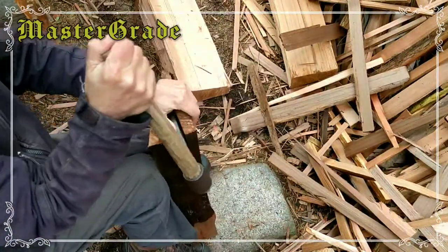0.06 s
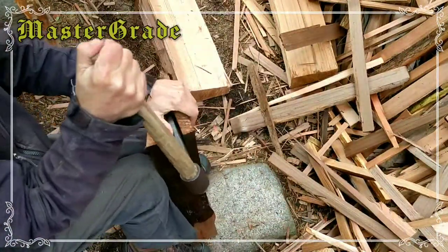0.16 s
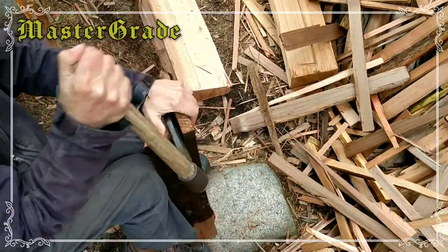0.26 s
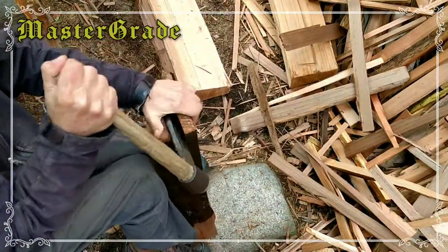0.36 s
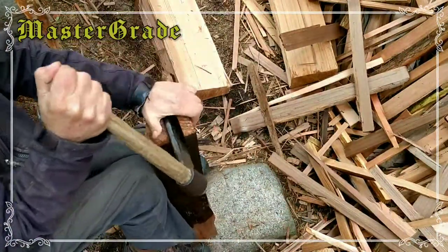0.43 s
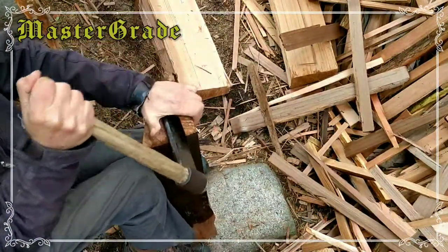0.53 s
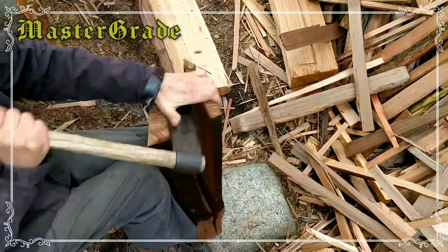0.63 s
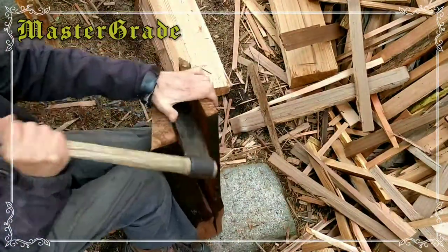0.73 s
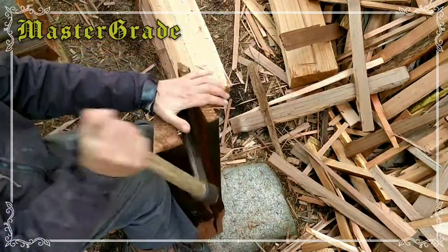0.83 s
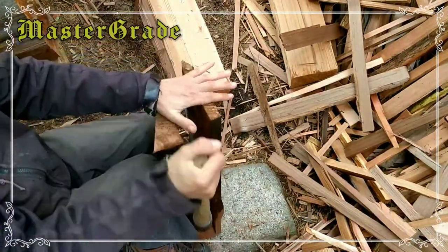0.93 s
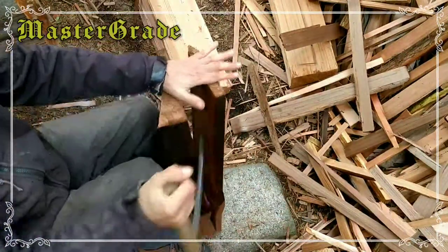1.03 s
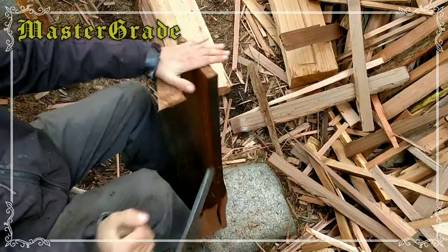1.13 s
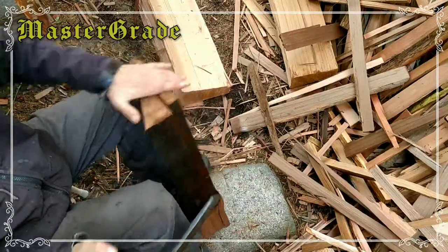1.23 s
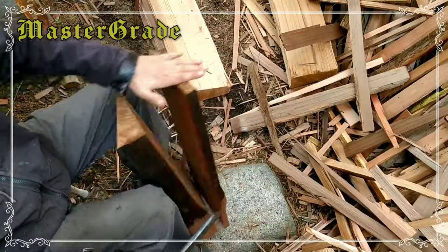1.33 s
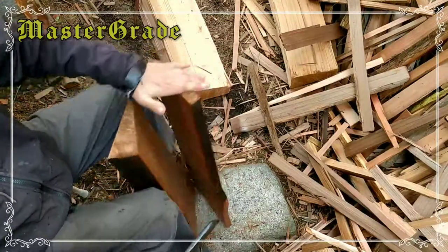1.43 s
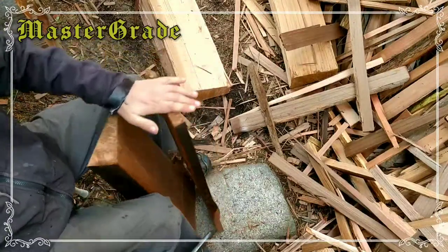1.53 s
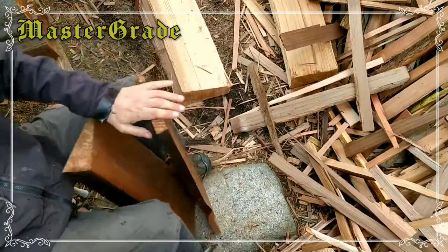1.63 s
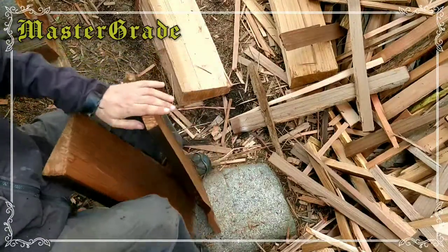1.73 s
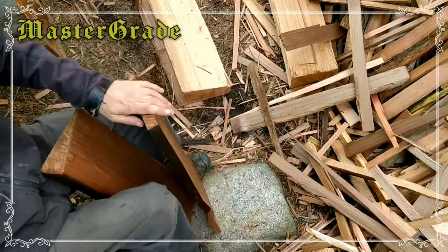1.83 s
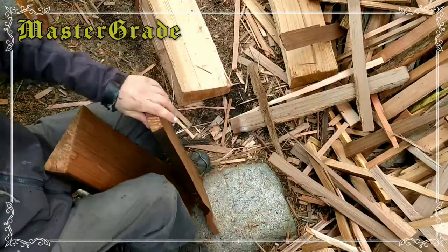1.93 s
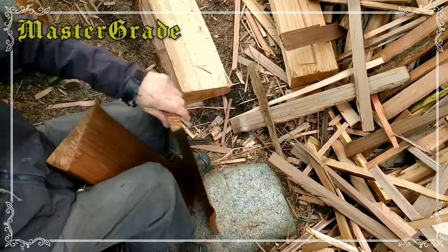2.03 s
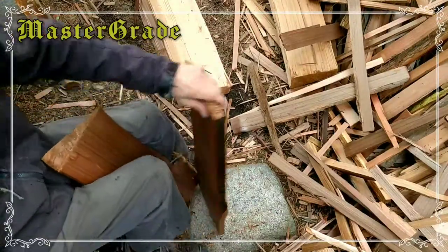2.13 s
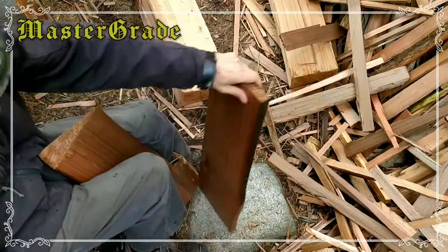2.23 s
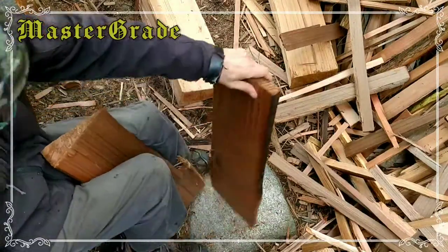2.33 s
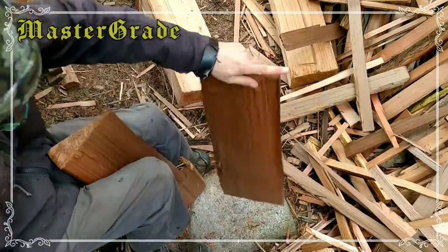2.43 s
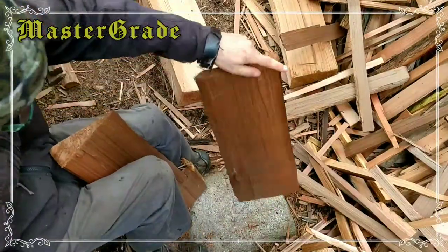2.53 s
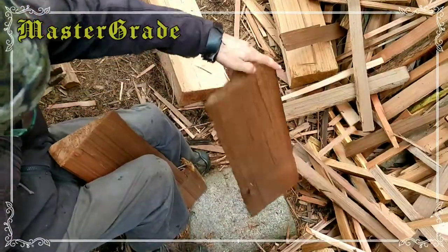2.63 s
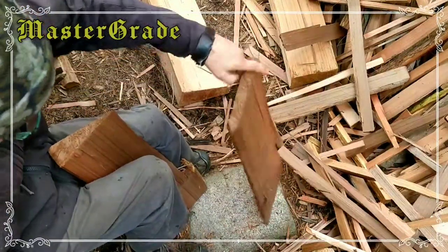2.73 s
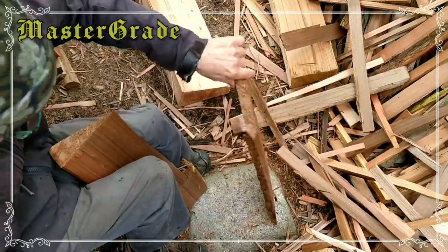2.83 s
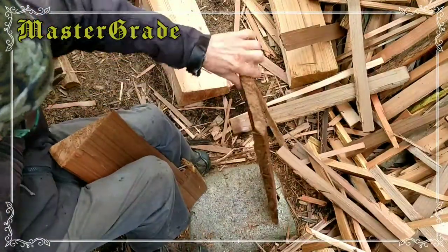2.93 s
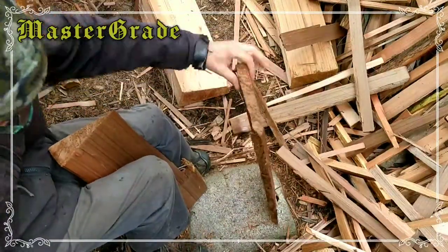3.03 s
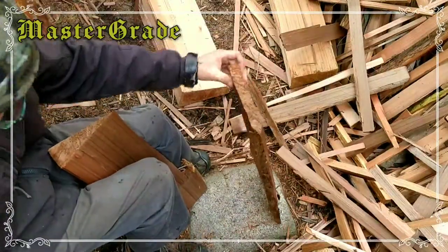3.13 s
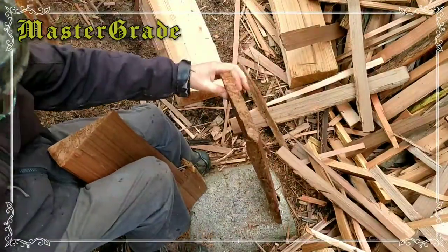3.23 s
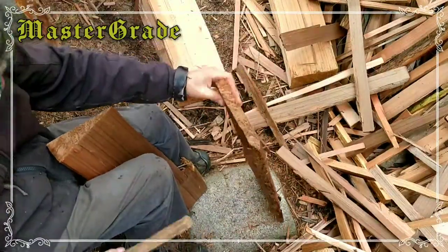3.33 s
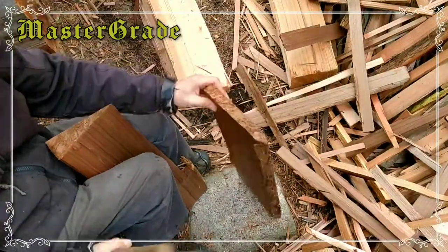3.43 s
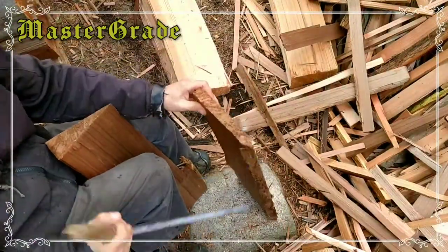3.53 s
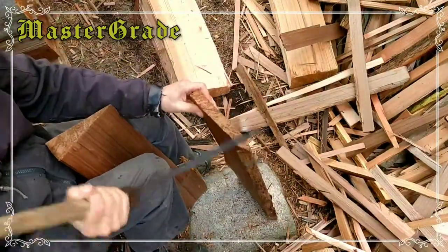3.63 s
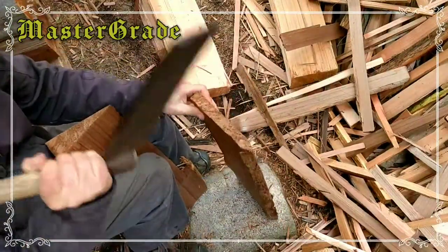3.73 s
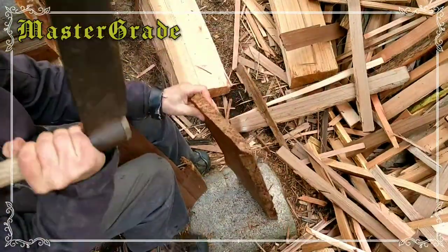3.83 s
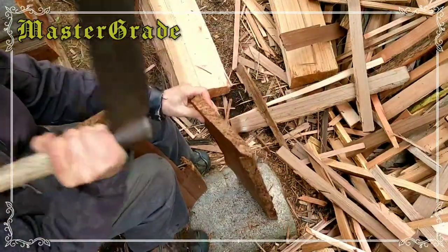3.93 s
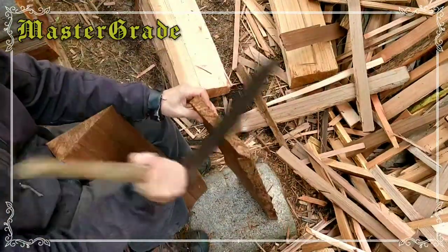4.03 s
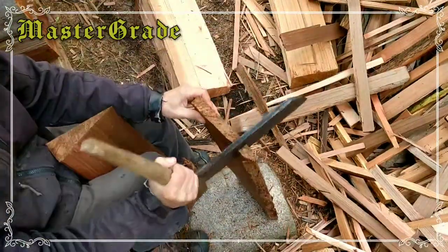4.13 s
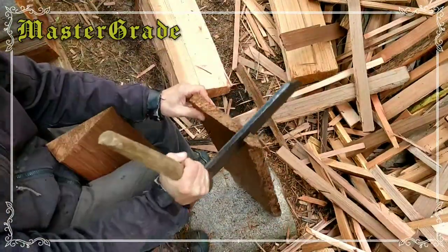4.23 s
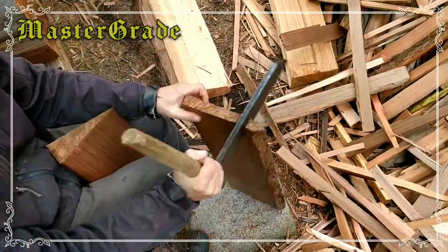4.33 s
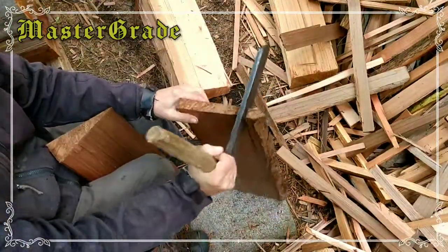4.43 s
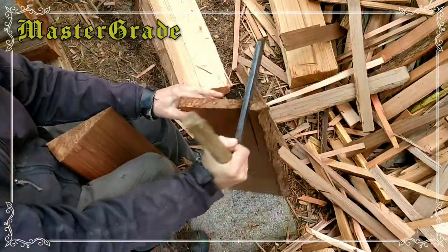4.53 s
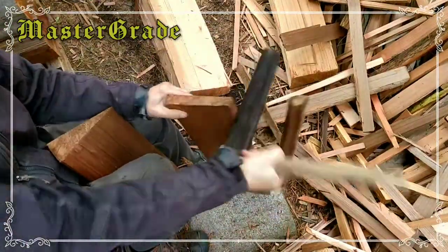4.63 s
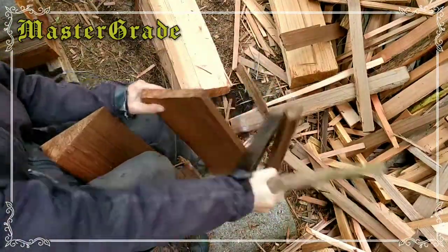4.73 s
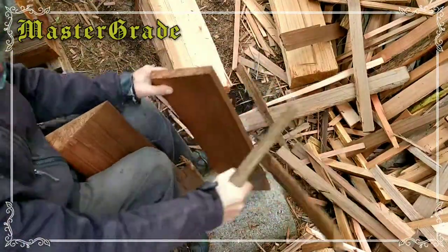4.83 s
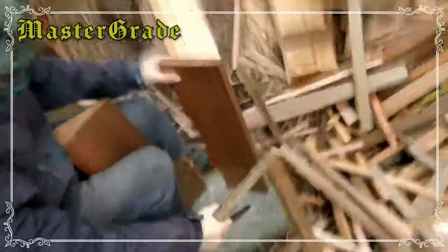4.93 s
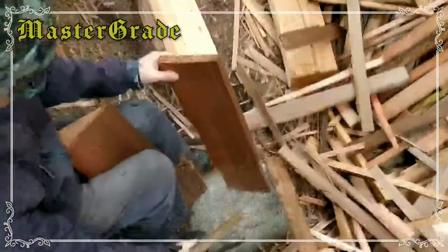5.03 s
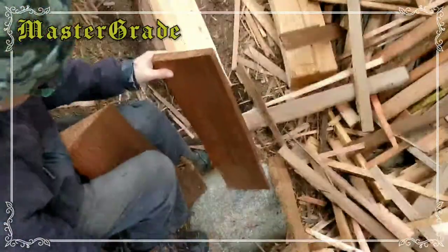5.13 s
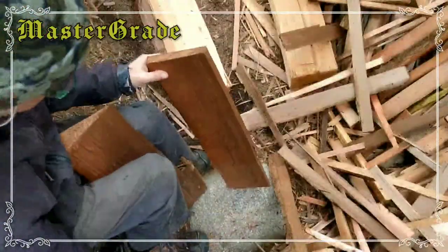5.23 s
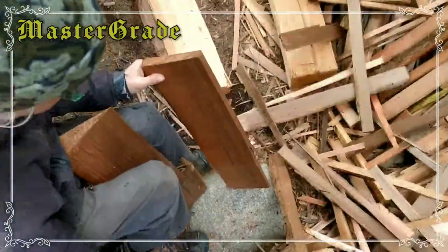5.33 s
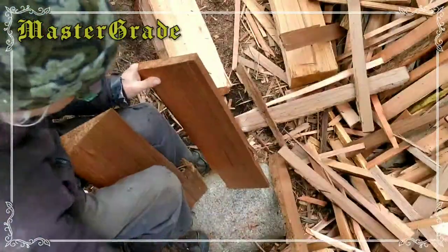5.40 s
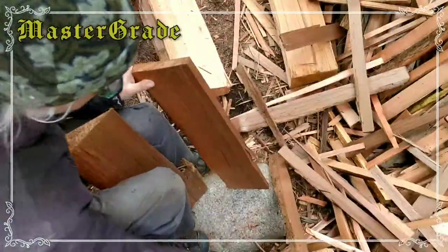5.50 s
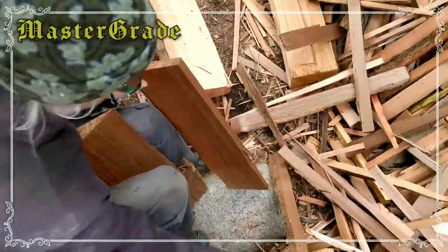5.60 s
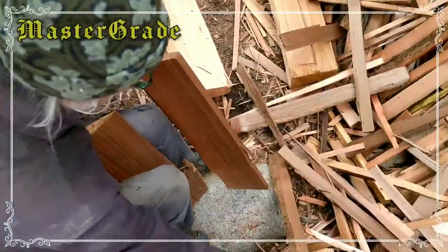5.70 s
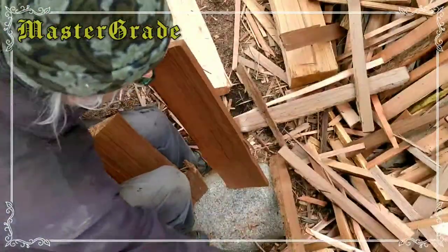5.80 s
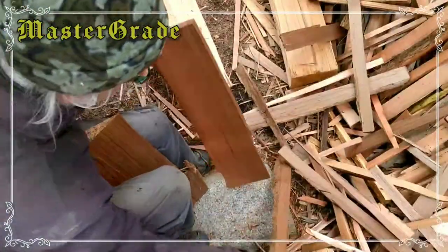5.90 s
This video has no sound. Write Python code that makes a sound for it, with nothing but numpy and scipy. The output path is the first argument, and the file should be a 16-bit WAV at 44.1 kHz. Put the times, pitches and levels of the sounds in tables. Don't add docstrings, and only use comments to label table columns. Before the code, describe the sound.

Wood cracks and splits under a steel blade, a board knocks and lands ringing on stone, then trimming chops and a clanging tool drop outdoors.

```python
import sys
import numpy as np
from scipy import signal
from scipy.fft import rfft, irfft
from scipy.io import wavfile
from scipy.ndimage import uniform_filter1d

SR = 44100
rng = np.random.default_rng(int(sys.argv[2]) if len(sys.argv) > 2 else 0)


def persist_wave(psi):
    counts = np.round(np.clip(psi, -1, 1) * 32767).astype(np.int16)
    wavfile.write(sys.argv[1], SR, np.atleast_2d(counts).T)


def voltage_ratio(level):
    return 10 ** (np.asarray(level, float) / 20)


N = 262826
T = np.arange(N) / SR

# frequency in Hz, level in dB per Hz.
BRIGHT = [(4710, -17), (8000, -11), (8820, -12), (10700, -1), (12800, 1), (14800, -3), (16200, -29.5)]
# frequency in Hz, level in dB per Hz.
GRIT = [(760, -5), (1300, -6), (1730, -4.5), (1890, -4), (2940, -3.5), (3660, -2.5), (7650, -7),
        (9000, -30.5), (11700, -49), (19800, -120)]
# frequency ratio, level in dB, t60 in s.
BLOCK = [(0.801, -15, 0.04), (0.999, -0.5, 0.067), (1.449, -8, 0.025), (2.197, -9, 0.04),
         (3.601, -14.5, 0.036), (4.301, -24, 0.018)]


def colour(x, table):
    hz, db = np.transpose(table)
    f = np.linspace(1, SR / 2, 4097)
    log_gain = np.log(voltage_ratio(np.interp(np.log(f), np.log(hz), db, -70, -70)))
    cepstrum = irfft(log_gain)
    cepstrum[1:4096] *= 2
    cepstrum[4097:] = 0
    taps = irfft(np.exp(rfft(cepstrum)))[:4096]
    taps = taps / np.sqrt(np.sum(taps ** 2))
    return signal.fftconvolve(x, taps[None], axes=1)[:, :N]


def pair(alike):
    alike = np.clip(alike, 0, 1)
    shared, own = rng.standard_normal(N), rng.standard_normal((2, N))
    return np.sqrt(alike) * shared + np.sqrt(1 - alike) * own


def walk(rate):
    hold = int(SR / rate)
    steps = np.repeat(rng.standard_normal(N // hold + 1), hold)
    return 1.316 * uniform_filter1d(steps, hold)[:N]


def add(out, s, sound, pan_db):
    i = int(s * SR)
    sound = sound[..., :N - i]
    if pan_db is not None:
        sound = sound * voltage_ratio(np.array([[pan_db], [-pan_db]]) / 2)
    out[:, i:i + sound.shape[-1]] += sound


def swell(length):
    return np.sin(np.linspace(0, np.pi, int(length * SR))) ** 1.1


def mirrored(x):
    echo_share, echo_ms, spread_ms = .5, .55, .3
    for rate in 35, 55:
        lag = np.clip(echo_ms + spread_ms * walk(rate), .1, 2) * SR / 1000
        late = np.array([np.interp(np.arange(N) - lag, np.arange(N), v) for v in x])
        x = (x - echo_share * late) / np.sqrt(1 + echo_share ** 2)
    return x


def knocks(hits, modes, blow_s, grind_s, grind_db, scatter_db, thud_db, thud_hz, tuned=False):
    out, t = np.zeros((2, N)), T[:SR // 2, None]
    hz, db, t60 = np.transpose(modes)
    blow = np.hanning(max(int(blow_s * SR), 1) + 2)
    dull = signal.butter(2, [92, thud_hz], "band", fs=SR, output="sos")
    sides = (-1.) ** np.arange(len(hz))
    for s, peak_db, damping, *spot in hits:
        luck = rng.standard_normal(len(hz))
        rough, ground = rng.standard_normal(2048), rng.standard_normal((3, 4096))
        if tuned:
            f = hz * spot[0]
            tilt_db = sum(spot[1:]) * np.abs(np.log2(hz))
        else:
            f = hz
            tilt_db = sum(spot) * np.log2(hz / 700)
        mode_db = db + tilt_db + scatter_db * luck - 60 * t * damping / t60
        ring = (np.sin(2 * np.pi * f * t) * voltage_ratio(mode_db)) @ sides
        push = voltage_ratio(grind_db) * rough * np.exp(-T[:2048] / grind_s)
        push[0] += 1
        sound = signal.fftconvolve(ring, np.convolve(push, blow))
        add(out, s, sound * voltage_ratio(peak_db) / np.abs(sound).max(), 1.2 + 1.2 * rough[0])
        decay = voltage_ratio(-60 * T[:4096] * damping / 0.093)
        thud = signal.sosfilt(dull, (ground[0] + 0.69 * ground[1:]) * decay)
        add(out, s, thud * voltage_ratio(peak_db + thud_db) / np.abs(thud).max(), -.5)
    return out


def wind():
    # time in s, level in dB.
    gusts = [(0.0, -55.5), (0.76, -50.5), (1.33, -57), (1.87, -48.5), (2.54, -52), (2.72, -44),
             (3.14, -53.5), (3.93, -54), (4.3, -45.5), (4.52, -49.5), (4.75, -58), (4.88, -44),
             (5.06, -32.5), (5.19, -36), (5.44, -48), (5.96, -55)]
    # frequency in Hz, level in dB per Hz.
    turbulence = [(15, -20.5), (25, -5), (60, -4), (110, -19), (200, -48)]
    level_db = np.interp(T, *np.transpose(gusts)) + 2.2 + 2.0 * walk(4.7)
    return colour(pair(0.62), turbulence) * voltage_ratio(level_db)


def hiss():
    # frequency in Hz, level in dB per Hz.
    noise_floor = [(59, -27), (100, -5), (1970, -22.5), (4520, -12.5), (7690, -22.5), (8550, -24),
                   (10600, -18.5), (12800, -24.5), (15200, -27.5), (16200, -45.5)]
    hiss_db = -49
    return voltage_ratio(hiss_db - 7.5 + 2.2 * walk(18)) * colour(pair(0.16), noise_floor)


def rub():
    # time in s, level in dB.
    hands = [(0, -52), (.8, -47.5), (.9, -54.5), (1.4, -50), (1.6, -62), (1.85, -60), (2.2, -54),
             (2.9, -58.5), (3.2, -61), (4.45, -62.5), (5.1, -50), (5.4, -54), (5.6, -64.5), (5.96, -63)]
    # start in s, end in s, grit in dB, board against grit in dB.
    scrapes = [(0.061, 0.131, -44, -3.5), (0.15, 0.195, -44.5, -2), (0.33, 0.402, -29.5, -6),
               (0.364, 0.486, -32, -13), (0.545, 0.59, -45, -11), (0.589, 0.694, -31.5, -9.5),
               (0.665, 0.708, -26, 12), (0.982, 1.095, -69, 20.5), (1.09, 1.26, -70.5, 23.5),
               (1.325, 1.435, -52, 12), (1.422, 1.5, -43, -9), (1.79, 1.93, -49, 2),
               (2.013, 2.18, -55.5, 4), (2.151, 2.209, -25, -10), (2.19, 2.248, -58, 7),
               (2.29, 2.41, -47.5, 8), (2.43, 2.65, -58, 0), (2.657, 2.795, -49.5, 10),
               (2.834, 2.984, -65, 7), (3.063, 3.192, -55, -32.5), (3.154, 3.281, -67.5, 7.5),
               (3.357, 3.542, -64.5, 1), (3.539, 3.692, -49, -31.5), (4.157, 4.253, -39.5, -10.5),
               (4.21, 4.365, -51.5, 0), (4.326, 4.488, -55.5, -12), (4.691, 4.737, -23, -4.5),
               (4.632, 4.817, -36, -16.5), (4.775, 4.942, -43.5, -1.5), (4.993, 5.057, -30.5, -2),
               (5.437, 5.522, -49, -20)]
    # frequency in Hz, level in dB per Hz.
    board_colour = [(71, -42), (120, -17), (284, -10), (431, -12), (550, -11), (700, -11), (1080, -13),
                    (1500, -19), (3000, -22), (3900, -39.5), (6600, -120)]
    layers_db = np.array([[-2], [0], [-0.5]])
    level = voltage_ratio(np.interp(T, *np.transpose(hands)) + layers_db)
    for start, end, grit_db, board_db in scrapes:
        fibre_db = -4 - 0.07 * board_db
        db = grit_db + np.array([fibre_db, 0, board_db])
        add(level, start, voltage_ratio(db)[:, None] * swell(end - start), None)
    grain_db = 3.5 * walk(400) + 2.5 * walk(90)
    fibre = colour(level[0] * voltage_ratio(grain_db) * pair(0.4), BRIGHT) * voltage_ratio(np.array([[4.0], [-5.5]]))
    grit = colour(level[1] * voltage_ratio(.9 * grain_db) * pair(.25), GRIT)
    judder = voltage_ratio(2.5 * walk(120))
    board = voltage_ratio(1.2) * colour(level[2] * judder * pair(0.56), board_colour)
    return fibre + mirrored(grit) + board + singing(judder)


def fibre_snaps():
    # time in s, peak in dB, share below 8 kHz in dB.
    tick_events = [(0.0814, -2.5, -22), (0.3729, 0.5, -2), (0.5505, -20, -12), (0.5794, -3.5, -6.5),
                   (0.818, -5.5, -14), (1.3291, -21, -12), (1.5192, 2, -21.5), (1.8108, -11, -29),
                   (2.1554, -6.5, -40), (4.6927, -10.5, -2.5), (4.7266, 3, -24)]
    # s, dB, dB.
    snap_events = [(0.0524, -15, -38), (0.2034, -14.5, -13), (0.7346, 4, -16.5), (1.442, -10, -14.5),
                   (1.4503, -6.5, -24.5), (1.4634, -6, -32), (1.4794, -10, -24), (1.5341, -14, -19),
                   (1.5549, -4.5, -19), (1.6537, -24.5, -37), (1.699, -22.5, -40), (1.7414, -15, -23.5),
                   (1.7461, -7.5, -21.5), (1.7749, -14, -24), (1.821, -16.5, -15), (2.1254, -15.5, -17.5),
                   (2.1758, -2, -44), (2.1838, -13.5, -28), ]
    # s, dB, dB.
    crack_events = [(0.0374, -13, -16), (0.3456, -10, -7), (0.3514, -13.5, -5), (0.5854, -14, -9),
                    (0.6694, -13.5, -15), (0.7123, -8, -12), (0.7471, -22.5, -3), (1.282, -29, -14),
                    (1.4296, -25, -12), (1.4691, -13, -11.5), (1.5768, -8.5, -15.5), (1.868, -16, -13.5),
                    (2.0542, -28.5, -5), (2.235, -26, -8), (2.6519, -31, -7.5), (4.1682, -4, -3.5),
                    (4.1719, 3, -13), (4.6861, -14.5, -20.5), (4.7074, -5, -8.5), (4.8209, -27, -8),
                    (5.0004, -1.5, -5),]
    # s, dB, dB.
    tear_events = [(0.0754, -15, -8), (0.122, -14.5, -9), (0.187, -14, -14.5), (0.3793, -6, -8),
                   (0.6726, -15, 8), (0.7692, -3.5, -8.5), (1.1073, -41.5, 4), (1.154, -37, 3),
                   (1.1844, -30, -0.5), (1.3353, -28, 5.5), (2.1725, -29.5, -14.5), (2.1874, -2.5, -28.5),
                   (4.6952, 7.5, -11), (4.9092, -9, -9.5), (5.2185, -21.5, -2), (5.2949, -20, -4.5),
                   (5.3154, -25, -4)]
    kinds = (tick_events, .014), (snap_events, .017), (crack_events, .035), (tear_events, .032)
    (top, mid, thin), t = np.zeros((3, 2, N)), T[:SR // 8]
    thin_from_db, thin_hz = -10, 2600
    onset = 1 - np.exp(-t / .0003)
    for rows, t60 in kinds:
        for s, peak_db, mid_db in rows:
            pan_db = 2.5 - 0.09 * mid_db
            crack = voltage_ratio(peak_db - 14.0 - 60 * t / 0.0009)
            body = voltage_ratio(peak_db - 3 - 60 * t / max(t60, .004))
            tail = voltage_ratio(peak_db - 29 - 60 * t / .06)
            burst = (crack + body + tail) * onset
            top_share = np.sqrt(np.clip(1 - voltage_ratio(2 * mid_db), .05, 1))
            add(top, s, burst * top_share, 2.3 * pan_db)
            add(thin if mid_db < thin_from_db else mid, s, burst * voltage_ratio(mid_db), 0.33 * pan_db)
    splinter = voltage_ratio(4.8 * walk(1200))
    tick = [(1000, -25), (1250, -8), (1500, -16), (1780, 0), (2150, -22)]  # (Hz, dB)
    answer = voltage_ratio(-25) * colour(top * pair(1.0), tick)
    fibre = colour(top * splinter * pair(0.32), BRIGHT)
    grit = splinter * pair(0.15)
    high = signal.butter(2, thin_hz, "high", fs=SR, output="sos")
    lean = signal.sosfilt(high, thin * grit)
    middle = colour(mid * grit + lean + voltage_ratio(-9) * thin * grit, GRIT)
    return answer + voltage_ratio(-8) * fibre + voltage_ratio(1.2) * mirrored(middle)


def block_knocks():
    # time in s, peak in dB, damping factor, pitch in Hz, fall of other modes in dB per octave.
    hits = [(0.888, -26.5, 4.2, 190), (1.013, -19, 7.2, 245), (1.104, -27, 1.1, 850),
            (1.181, -27.5, 0.86, 220), (1.464, -29.5, 1, 1140), (1.374, -12, 2.0, 500, -6),
            (1.562, -29, 0.6, 437, -20), (1.87, -19, 4.1, 201), (2.234, -31, 2.4, 293),
            (3.173, -36.5, 1, 754), (3.583, -10, 3.2, 279), (3.586, -30, 2.7, 608), (4.167, -8, 2.3, 289),
            (4.327, -32, 1.1, 294, -20), (4.876, -24.5, 6.6, 256), (5.299, -18.5, 4.9, 188),
            (5.319, -13, 9.9, 705), (5.518, -35, 1.5, 660, -10), (0.079, -33, 2.5, 530, -10),
            (0.19, -40, 0.35, 905, -25), (1.579, -28, 2, 150, -15), (4.275, -38, 1, 310, -20),
            (4.464, -30, 2, 200, -12), (4.712, -18, 1.5, 323, -12), (4.82, -33, 2, 300, -6),
            (5.055, -19, 1.8, 430, -12), (5.095, -21, 2, 330, -10), (5.412, -45, 0.2, 420, -30)]
    return knocks(hits, BLOCK, .0004, 0.012, -13.5, 0.53, -7.5, 270, tuned=True)


def split_blows():
    # time in s, peak in dB, damping factor, brightness in dB per octave.
    hits = [(0.3455, -18, 1.6, 5), (0.373, -1, 2.6, 2), (0.377, -4, 2.2, 1.5), (0.579, -15.5, 1.1, -1),
            (0.6745, 1.5, 3.3, -1), (0.683, -7.5, 2.0, 0), (0.7015, -3, 1.5, 0), (0.769, -22, 0.88, 1.5),
            (2.183, -17.5, 1.1, -7), (4.172, -9, 3.3, -0.5), (4.696, -11.5, 1.5, 1.5),
            (4.711, -10, 1.3, -1.5), (5, 0, 3.8, -0.5), (5.053, -12, 1.9, -1.5)]
    # frequency in Hz, level in dB, t60 in s.
    modes = [(181.8, -11.5, 0.077), (330, -12, 0.08), (505.6, 0.5, 0.042), (723.3, -6.5, 0.078),
             (810, -10, 0.098), (939, -4.5, 0.045), (1158, -1, 0.028), (1350, -4, 0.017), (1771, -13, 0.04),
             (2240, -12, 0.028)]
    return knocks(hits, modes, .0002, 0.0056, -15, 0.56, -14, 500)


def clean_raps():
    # time in s, peak in dB, damping factor, pitch in Hz, fall of other modes in dB per octave.
    hits = [(0.3745, -8, 3, 1400, -8), (0.379, -7, 1.5, 495, -12), (0.687, -8, 2.1, 650, -10),
            (0.7015, -1.5, 1.8, 960, -12), (0.745, -24, 1.2, 760, -12), (1.341, -15, 0.5, 460, -20),
            (1.343, -23, 2, 900, -6), (1.3745, -22, 2.5, 1150, -3), (1.39, -31, 1.5, 900, -6),
            (1.532, -36, 1.5, 880, -10), (1.565, -34, 1.2, 1250, -8), (4.698, -2.5, 0.95, 1030, -20),
            (5.409, -22, 4.2, 340, -3)]
    return knocks(hits, BLOCK, .0002, .004, -24, .5, -16, 400, tuned=True)


def jolts():
    # time in s, peak in dB, frequency in Hz, t60 in s, left gain against right as a ratio.
    shocks = [
        (1.874, -17.5, 59.7, 0.087, 0.36),
        (4.182, -24.5, 60, 0.41, 0.99),
        (5.002, -11, 133.3, 0.078, 0.41),
        (5.008, -7.5, 28, 0.48, 0.14),
        (5.30, -21, 69.6, 0.19, 0.97),
    ]
    out = np.zeros((2, N))
    for s, peak_db, hz, t60, left in shocks:
        t = np.maximum(T - s, 0)
        out += np.array([[left], [1]]) * np.sin(2 * np.pi * hz * t) * voltage_ratio(peak_db - 60 * t / t60)
    return out


def singing(judder):
    # start in s, end in s, level in dB, resonances as pairs of Hz and dB.
    drags = [
        (2.44, 2.68, -46, [(300, -30), (530, -9), (620, -24), (730, -12), (880, -22), (1090, 0), (1400, -20), (1750, -5), (2000, -30)]),
        (2.79, 2.99, -51, [(450, -30), (554, 0), (660, -24), (764, -2), (1200, -24), (1640, -8), (1950, -26), (2260, -8), (2500, -35)]),
        (2.295, 2.41, -38, [(200, -25), (300, -3), (410, -16), (540, 0), (780, -20), (1050, -7), (1350, -22), (1650, -8), (2400, -22)]),
    ]
    out = np.zeros((2, N))
    for start, end, db, peaks in drags:
        drag = np.zeros((2, N))
        add(drag, start, voltage_ratio(db) * swell(end - start), 0)
        out += colour(drag * judder * pair(.9), peaks)
    return out


def held_knocks():
    # time in s, peak in dB, damping factor, brightness in dB per octave.
    hits = [
        (2.656, -18, 1.3),
        (4.908, -22.5, 0.83),
        (5.007, -14.5, 0.6),
        (5.06, -27, 0.7, -2),
        (5.094, -20, 2.5, -5),
    ]
    # frequency in Hz, level in dB, t60 in s.
    modes = [(207, -3, .27), (222, -11, .2), (400, -11, .08), (533, -8, .15), (657, -16, .12),
             (1010, -13, .1), (1028, -8, .2), (1114, -15, .12), (1190, -16, .12)]
    return knocks(hits, modes, .0001, .002, -30, 1.2, -12, 1500)


def shake_knocks():
    # time in s, peak in dB, damping factor.
    hits = [
        (2.729, 3, 1.27),
        (2.766, -14, 0.98),
        (2.93, -39, 0.58),
        (3.248, -51, 1.9),
        (4.464, -27.5, 3.3),
    ]
    # frequency in Hz, level in dB, t60 in s.
    modes = [(183, -18.5, 0.18), (547.2, 1.5, 0.13), (575, -17, .2), (766.6, -8, 0.07), (880, -9, 0.07),
             (1085, 3, 0.1), (1250, -10, 0.11), (1646, -22, 0.1), (2282, -19, 0.04)]
    return knocks(hits, modes, .0002, 0.0096, -23, 5.6, -10.0, 400)


def bird():
    # start in s, length in s, from Hz, to Hz, level in dB.
    whistles = [(3.12, .06, 4620, 4400, -64), (3.173, .07, 4200, 3830, -61), (3.335, 0.05, 4380, 4720, -58),
                (3.455, .05, 4560, 4420, -61), (3.49, 0.06, 3950, 4100, -60), (3.575, .06, 4800, 5150, -58),
                (3.675, 0.06, 4380, 4700, -61), (3.79, .04, 4600, 4400, -62), (3.815, .05, 4050, 3550, -62),
                (3.95, 0.06, 4400, 4720, -60), (4.065, 0.055, 4650, 3800, -58)]
    out = np.zeros((2, N))
    waver = 1 + .007 * walk(130) + .004 * walk(700)
    flutter_db = 4 * walk(60)
    for s, length, from_hz, to_hz, db in whistles:
        hz = np.linspace(from_hz, to_hz, int(length * SR))
        span = slice(int(s * SR), int(s * SR) + len(hz))
        tone = np.sin(2 * np.pi * np.cumsum(hz * waver[span]) / SR)
        add(out, s, voltage_ratio(db + flutter_db[span]) * np.hanning(len(hz)) * tone, 1.5)
    return out


def far_whine():
    # start in s, end in s, frequency in Hz, level in dB.
    start, end, hz, db = (3.72, 4.1, 1385, -66)
    out, envelope = np.zeros((2, N)), np.sqrt(swell(end - start))
    add(out, start, voltage_ratio(db) * envelope * np.sin(2 * np.pi * hz * T[:len(envelope)]), 0)
    return out


def blade_ring():
    # time in s, peak in dB, damping factor.
    hits = [
        (4.9087, -17.5, 1.5),
    ]
    # frequency in Hz, level in dB, t60 in s.
    modes = [(2412, -9, .09), (3332, 0, .14), (4883, -1, .09), (5943, -12, .09), (6573, -12, .09)]
    return knocks(hits, modes, .00005, .001, -28, 1.5, -24, 3000)


def eye_ring():
    # time in s, peak in dB, damping factor.
    hits = [
        (5.2145, -14, 0.88),
        (5.3183, -30, 0.69),
    ]
    # frequency in Hz, level in dB, t60 in s.
    modes = [(422, -23, .8), (1168, -21, .25), (2105, 0, .125), (2353, -18, .15), (2745, -15, .14),
             (3348, -7, .16), (4290, -7, .06), (5900, -4, .09), (6638, -14, .1)]
    return knocks(hits, modes, .00005, .001, -34, .8, -22, 3000)


def scene():
    port_lag, left_vent_hz, left_turn_hz = 4, 130, 30
    wood = block_knocks() + split_blows() + clean_raps() + held_knocks() + shake_knocks()
    steel = blade_ring() + eye_ring()
    near = rub() + fibre_snaps() + wood + steel
    near[1] = np.roll(near[1], port_lag)
    vent = signal.butter(1, left_vent_hz, "high", fs=SR)
    near[0] = signal.lfilter(*vent, near[0])
    yard = rng.standard_normal((2, SR // 4)) * voltage_ratio(-50 - 60 * T[:SR // 4] / .1)
    scatter = signal.fftconvolve(near, yard, axes=1)[:, :N]
    outdoors = wind() + hiss() + bird() + far_whine()
    out = near + scatter + jolts() + outdoors
    pole = np.exp(-2 * np.pi * left_turn_hz / SR)
    out[0] = signal.lfilter([pole, -1], [1, -pole], out[0])
    return out


def low_pass(x):
    return signal.sosfilt(signal.butter(12, 16350, fs=SR, output="sos"), x)


def record(dry):
    cut = signal.ellip(8, .3, 70, 16300, fs=SR, output="sos")
    mix = signal.sosfilt(cut, np.clip(dry, -1, 1))
    return low_pass(mix)


dry = scene()
out = record(dry)
persist_wave(out)
```